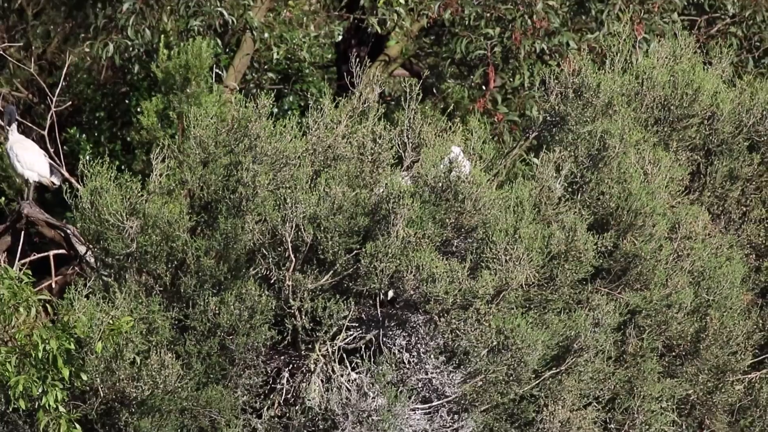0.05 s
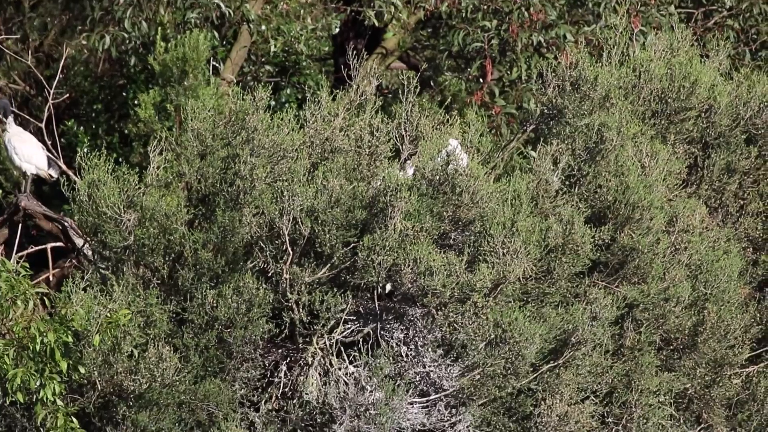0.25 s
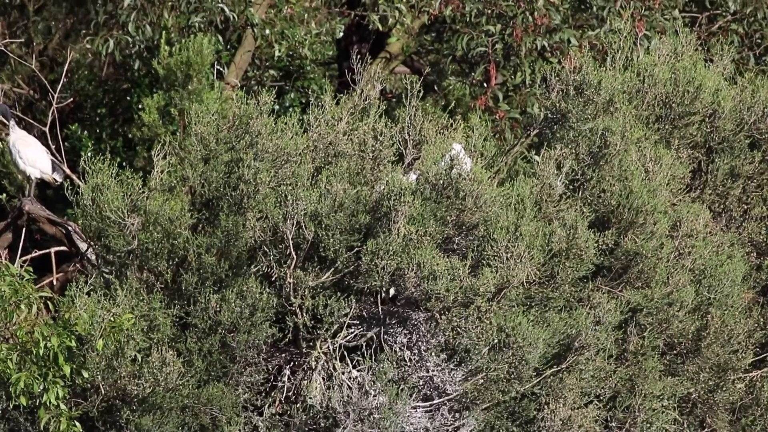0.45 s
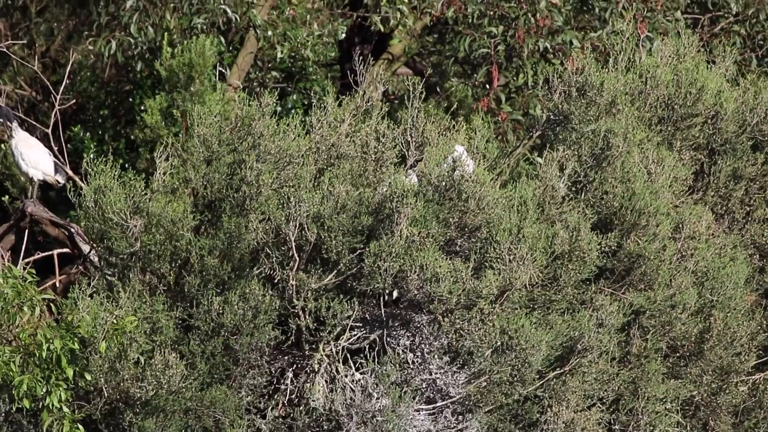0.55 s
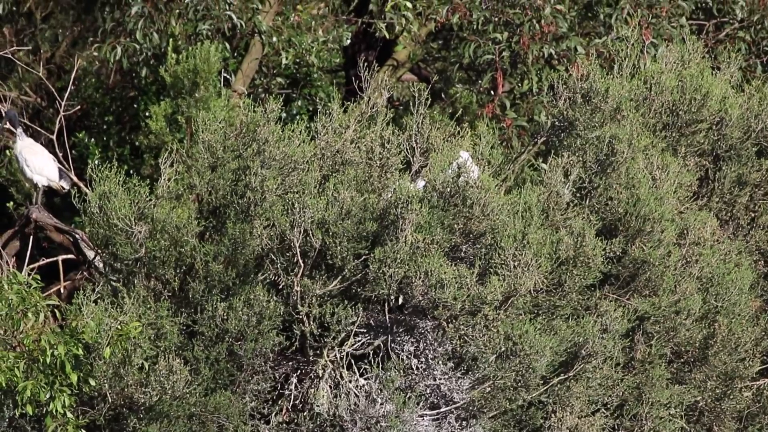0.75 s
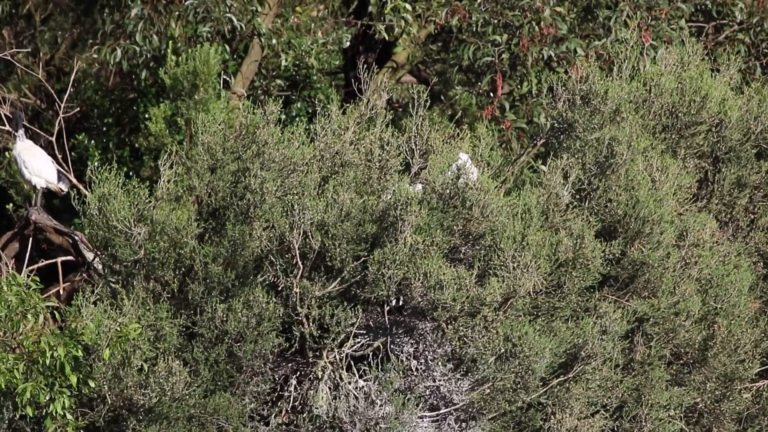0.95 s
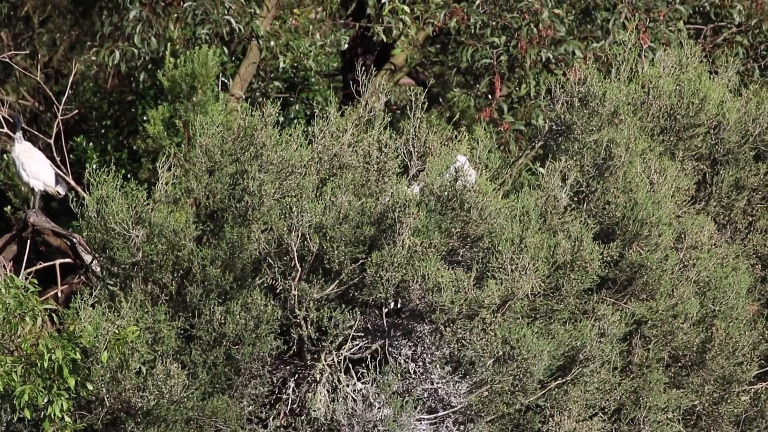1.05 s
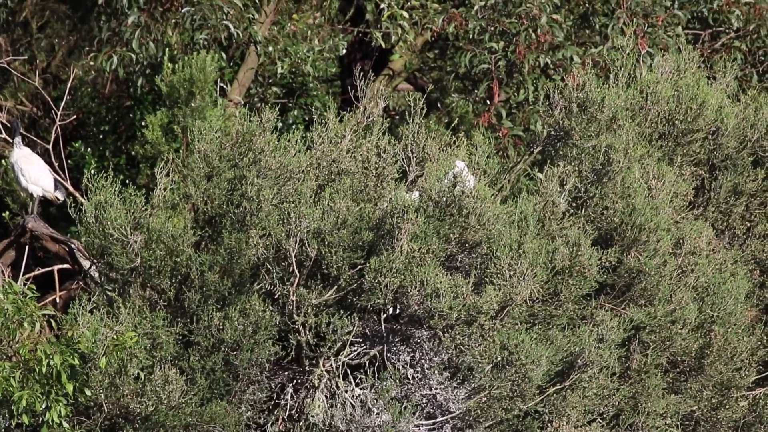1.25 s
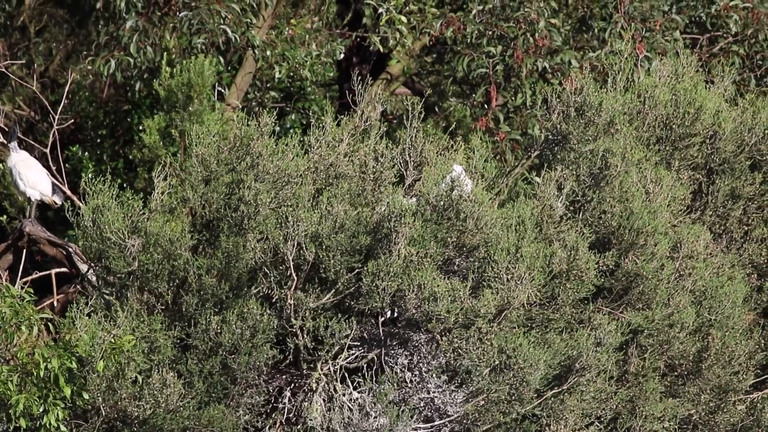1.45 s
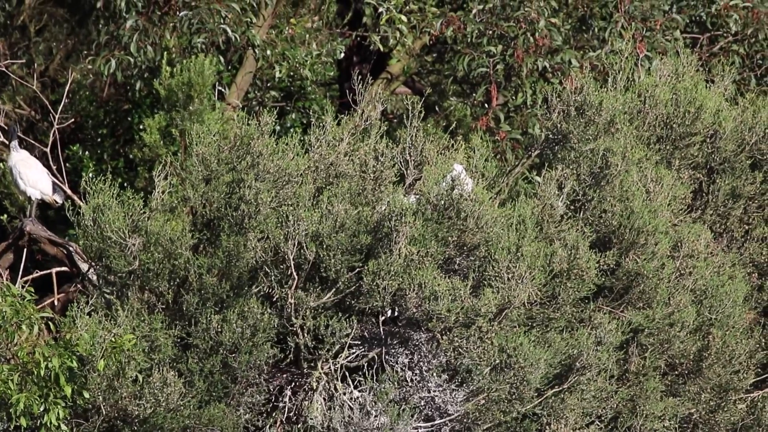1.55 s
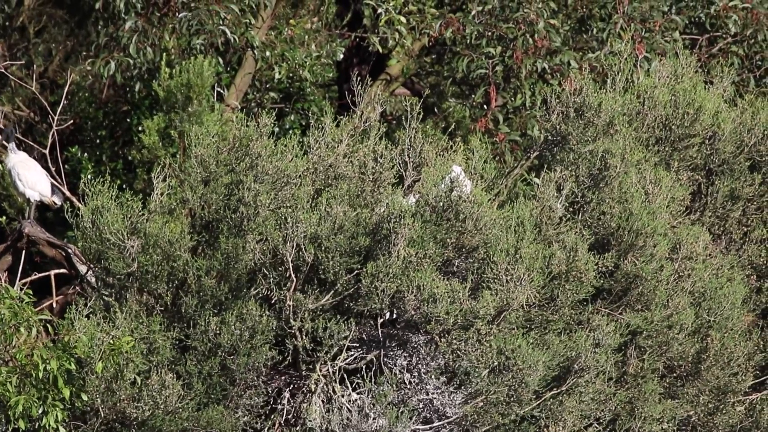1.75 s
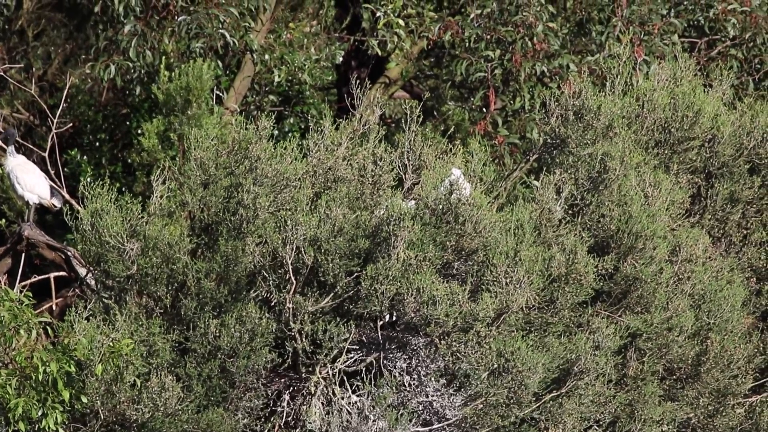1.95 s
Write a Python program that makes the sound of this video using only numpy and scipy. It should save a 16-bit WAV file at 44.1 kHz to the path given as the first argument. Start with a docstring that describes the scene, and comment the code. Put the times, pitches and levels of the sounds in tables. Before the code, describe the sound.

Harsh squawks come from a colony of large birds in the bushes, two close to the microphone, then two farther off. Faint yelps, hoots and honks surround them, and a dry snap sounds near the end over quiet outdoor noise.

```python
"""Bird colony in dense shrubs.

A near bird gives two harsh squawks and a farther one answers, among thin whistles, quick yelps, low
hoots and nasal honks. Each is a source and filter: harmonics of the syrinx shaped by the throat.
A small bird's chip, twig taps and a low outdoor rush are filtered noise; a sharp click rings in
damped modes. The bushes scatter a short echo."""
import sys
import numpy as np
from scipy import signal
from scipy.fft import rfft, irfft, next_fast_len
from scipy.io import wavfile
from scipy.ndimage import uniform_filter1d, map_coordinates

SR = 44100
rng = np.random.default_rng(int(sys.argv[2]) if len(sys.argv) > 2 else 0)


def generate_wav(sig):
    """Save sig (samples, or channels by samples) to the path in sys.argv[1] as 16-bit PCM at SR."""
    pcm = np.round(np.clip(np.atleast_2d(sig).T, -1, 1) * 32767).astype(np.int16)
    wavfile.write(sys.argv[1], SR, pcm)


N = 88200
T = np.arange(N) / SR


def amp(db):
    """Amplitude ratio of a level in decibels."""
    return 10 ** (np.asarray(db) / 20)


def unit_rms(x):
    """Normalisation to unit mean power."""
    return x / np.sqrt(np.mean(x ** 2) + 1e-20)


def response_at(points, hz):
    """Interpolation of (freq_hz, value) points on a logarithmic frequency axis."""
    freqs, values = np.transpose(points)
    return np.interp(np.log(hz + 1), np.log(freqs + 1), values)


def curves(rows, at):
    """Linear interpolation of each later column against the first."""
    knots, *columns = np.transpose(rows)
    return [np.interp(at, knots, column) for column in columns]


def wobble(rate_hz):
    """Smooth random modulation: a spline through Gaussian knots."""
    return map_coordinates(rng.standard_normal(N // 8), [T * rate_hz], mode="wrap")


def filtered(x, response):
    """Linear filtering: the spectrum is multiplied by a (freq_hz, gain_db) response."""
    size = next_fast_len(N + 8192)
    gain = amp(response_at(response, np.fft.rfftfreq(size, 1 / SR)))
    return irfft(rfft(x, size) * gain, size)[:N]


def gate(start, length, attack_s, release_s):
    """Amplitude envelope with quarter-sine edges."""
    ramp = np.minimum((T - start) / attack_s, (start + length - T) / release_s)
    return np.sin(np.pi / 2 * np.clip(ramp, 0, 1))


def notes(rows, throat, attack_s, release_s, jitter, flutter_db=1.5):
    """Source and filter: a harmonic series, weighted by the throat, glides through three pitches."""
    out = np.zeros(N)
    waver = 1 + jitter * wobble(500)
    flutter = amp(flutter_db * wobble(150))
    harmonics = np.arange(1, 12)[:, None]
    for start, length, db, *pitches in rows:
        on = (T >= start) & (T < start + length)
        glide = np.polyfit([0, .5, 1], pitches, 2)
        pitch = np.polyval(glide, (T[on] - start) / length)
        phase = 2 * np.pi * np.cumsum(pitch * waver[on]) / SR
        tone = (amp(response_at(throat, harmonics * pitch)) * np.sin(harmonics * phase)).sum(0)
        envelope = flutter * gate(start, length, attack_s, release_s)
        out[on] += amp(db) * unit_rms(tone) * envelope[on]
    return out


def rasp(pitch, rough, throat, second_ratio, second_depth, shimmer, jitter, lurch, hiss):
    """Amplitude modulation: an unsteady second membrane puts sidebands on the syrinx's harmonics."""
    pitch = pitch * (1 + rough * (jitter * wobble(700) + lurch * wobble(140)))
    phase = 2 * np.pi * np.cumsum(pitch) / SR
    second_phase = 2 * np.pi * np.cumsum(pitch * second_ratio * (1 + 0.0916 * wobble(220))) / SR
    source = hiss * rough * rng.standard_normal(N)
    for k in range(1, 17):
        beating = second_depth * np.sin(second_phase + 1.53 * wobble(130))
        harmonic = np.cos(k * phase + rng.uniform(0, 2 * np.pi))
        source += harmonic * (1 + rough * (beating + shimmer * wobble(450)))
    voice = filtered(source, throat)
    running_power = np.abs(uniform_filter1d(voice ** 2, size=700))
    return voice / np.sqrt(running_power + 1e-12)


# Reverberation time of the bushes: freq_hz, t60_s
SHRUB_DECAY = [(300, 1), (2000, 0.77), (5000, 1), (12000, .25)]


def shrubs(x, wet_db):
    """Multiple scattering: the bushes add a diffuse tail that decays exponentially in each band."""
    hz, t, spectra = signal.stft(rng.standard_normal(SR * 3 // 4), SR, nperseg=256)
    decay = amp(-60 * t / response_at(SHRUB_DECAY, hz)[:, None])
    tail = signal.istft(spectra * decay, SR, nperseg=256)[1]
    return x + amp(wet_db) * signal.fftconvolve(x, tail / np.linalg.norm(tail))[:N]


# Spectrum of the background: freq_hz, gain_db
RUSH_SPECTRUM = [(20, -27), (40, -13.5), (65, -4), (90, -8.5), (120, 0.5), (165, -10.5), (250, -2.5),
                 (310, -9.5), (400, -2), (600, 0), (780, -7), (1000, -4), (1400, -13), (1900, -9.5),
                 (2500, -16.5), (4000, -21), (7000, -29), (15500, -33.5)]


def outdoor_rush():
    """Modulated noise: distant air and foliage rush in patches that drift in time and frequency."""
    level_db, patch_db = -47.5, 3.03
    spectra = signal.stft(rng.standard_normal(N), nperseg=1024)[2]
    patches = uniform_filter1d(rng.standard_normal(spectra.shape), size=4, axis=0)
    patches = uniform_filter1d(patches, size=8, axis=1)
    noise = signal.istft(spectra * amp(patch_db * unit_rms(patches)), nperseg=1024)[1][:N]
    return amp(level_db) * unit_rms(filtered(noise, RUSH_SPECTRUM))


# Whistled notes: start_s, length_s, level_db, first_pitch_hz, middle_pitch_hz, last_pitch_hz
WHISTLES = [(.04, 0.08, -49, 2480, 2520, 2640), (1.645, 0.062, -46.5, 2065, 2005, 1940)]
# Throat response: freq_hz, gain_db
WHISTLE_THROAT = [(2500, 3), (5000, -22), (10000, -60)]


def whistles():
    """Low-pass filtering: the throat leaves a thin, nearly sinusoidal tone that glides slightly."""
    voice = notes(WHISTLES, WHISTLE_THROAT, attack_s=0.042, release_s=0.012, jitter=0.0023, flutter_db=3.5)
    return shrubs(voice, wet_db=-12)


# Yelped notes: start_s, length_s, level_db, first_pitch_hz, middle_pitch_hz, last_pitch_hz
YELPS = [(.084, 0.017, -43, 1030, 1160, 1350), (.106, 0.018, -39, 1086, 1237, 1264),
         (.127, 0.03, -39.5, 1202, 1185, 1154), (.204, 0.031, -43, 1050, 1215, 1270),
         (.226, 0.0044, -28, 1110, 1270, 1250), (.245, 0.026, -35.5, 1104, 1195, 1110),
         (.465, .02, -36, 1160, 1170, 1270), (.604, 0.021, -35.5, 1122, 1211, 1260),
         (.624, 0.029, -51, 1170, 1175, 1180), (.712, .016, -40, 1080, 1187, 1200),
         (.736, 0.02, -36.5, 1146, 1196, 1260), (.76, 0.025, -38.5, 1186, 1197, 1136)]
# Throat response: freq_hz, gain_db
YELP_THROAT = [(1000, -12), (1300, 1), (2000, 18), (2400, 8), (3600, -6), (4800, -10), (6000, -20.5),
               (9000, -37)]


def yelps():
    """Formant resonance: the throat lifts the second harmonic in quick runs of short notes."""
    voice = notes(YELPS, YELP_THROAT, attack_s=0.005, release_s=0.011, jitter=0.0052)
    return shrubs(voice, wet_db=-11)


# Hooted notes: start_s, length_s, level_db, first_pitch_hz, middle_pitch_hz, last_pitch_hz
HOOTS = [(.142, 0.021, -45.5, 554, 560, 535), (.312, 0.03, -40.5, 558, 572, 560),
         (.77, 0.022, -44.5, 633, 593, 564), (.793, 0.02, -38, 584, 578, 550),
         (1.684, 0.023, -43, 584, 562, 524), (1.93, 0.044, -50, 551, 547, 523)]
# Throat response: freq_hz, gain_db
HOOT_THROAT = [(560, 4.5), (1150, -9.5), (2500, -18), (6000, -48)]


def hoots():
    """Spectral roll-off: the fundamental dominates brief, dull notes from deep in the colony."""
    voice = notes(HOOTS, HOOT_THROAT, attack_s=0.018, release_s=0.019, jitter=0.0072)
    return shrubs(voice, wet_db=-10)


# Honks: start_s, length_s, level_db, first_pitch_hz, middle_pitch_hz, last_pitch_hz, beak_hz
HONKS = [(0.151, 0.13, -44.5, 593, 658, 631, 1930), (.85, .045, -48.5, 685, 707, 743, 2100),
         (1.558, 0.069, -47, 569.5, 613, 615, 1810), (1.591, .08, -39, 658.4, 674.6, 657, 1390),
         (1.655, 0.046, -42, 635.5, 611, 610, 1900), (1.695, 0.067, -46, 615.4, 619.4, 590, 1810)]
# Throat response: freq_hz, gain_db
HONK_THROAT = [(400, -26), (620, -2.5), (1250, 4.5), (1900, -2.5), (2500, 0), (3000, -4), (4500, -38),
               (6000, -21), (6750, -11.5), (9000, -44)]


def honks():
    """Cavity resonance: the beak favours one harmonic of each distant, nasal call."""
    peak_db, width_octaves = 10, 0.28
    hz = np.geomspace(300, 12000, 120)
    out = np.zeros(N)
    for *note, beak_hz in HONKS:
        beak_db = peak_db * np.exp(-(np.log2(hz / beak_hz) / width_octaves) ** 2)
        tract = np.transpose([hz, response_at(HONK_THROAT, hz) + beak_db])
        out += notes([note], tract, attack_s=0.015, release_s=0.022, jitter=0.0072)
    return shrubs(out, wet_db=-12.5)


# Vocal effort: time_s, level_db
NEAR_EFFORT = [(.262, -48.5), (.294, -34.5), (.306, -28.5), (.32, -29.5), (.342, -25.5), (.352, -25),
               (.385, -24), (.404, -22.5), (.425, -27), (.44, -38), (.475, -45), (.5, -32.5), (.522, -30),
               (.538, -25), (.556, -26.5), (.574, -32.5), (.594, -26.5), (.61, -35), (.635, -30),
               (.66, -74)]
# Vibration of the syrinx: time_s, pitch_hz, roughness (0 clear, 1 or more all rasp)
NEAR_SYRINX = [(.275, 761, 0.92), (.298, 896.3, 0.65), (.313, 939, 0.38), (.333, 946.4, 0.22),
               (.343, 950.4, 0.6), (.365, 928.3, 0.94), (.385, 919.4, 0.88), (.402, 917.3, 0.38),
               (.435, 927.3, 0.9), (.46, 941.6, 0.6), (.485, 847.6, 1.16), (.512, 890, 1.06),
               (.534, 917.6, 0.38), (.558, 903, 0.57), (.572, 896.3, 0.94), (.596, 865.6, 0.48),
               (.64, 861, 1)]
# Throat response in the clear tone: freq_hz, gain_db
NEAR_CLEAR_THROAT = [(900, -17), (1800, 1.5), (2750, -13), (3700, -17.5), (4650, -21.5), (5550, -30),
                     (6500, -33), (7450, -30), (8350, -24.5), (9200, -30), (10500, -42), (15000, -50)]
# Throat response in the rasp: freq_hz, gain_db
NEAR_RASP_THROAT = [(300, -80), (560, -16), (720, -8), (930, -24), (1170, -24.5), (1450, -5), (1650, 1),
                    (1810, 0.5), (2030, -3.5), (2250, -7.5), (2800, -10), (3650, -13.5), (4050, -25.5),
                    (4600, -26), (5100, -39), (5600, -24), (6100, -42), (8500, -35.5), (10500, -47),
                    (15000, -60)]
# The throat opens on the third harmonic early in the first squawk: time_s, gain_db
THIRD_HARMONIC = [(.3, -19), (.315, 13), (.329, 14), (.34, 6), (.36, -1)]


def near_bird():
    """Periodic and irregular vibration: two loud squawks break from a piercing tone into a rasp."""
    level_db, = curves(NEAR_EFFORT, T)
    pitch, rough = curves(NEAR_SYRINX, T)
    third_db, = curves(THIRD_HARMONIC, T)
    rough = np.clip(rough, 0, 1)
    waver, flutter_db = 0.009, 4.5
    phase = 2 * np.pi * np.cumsum(pitch * (1 + waver * rough * wobble(600))) / SR
    harmonics = np.arange(1, 17)[:, None]
    throat_db = response_at(NEAR_CLEAR_THROAT, harmonics * pitch) + third_db * (harmonics == 3)
    gains = amp([db + flutter_db * rough * wobble(220) for db in throat_db])
    partials = gains * np.sin(harmonics * phase + rng.uniform(0, 2 * np.pi, harmonics.shape))
    clear = np.sqrt(2) * partials.sum(0) / np.linalg.norm(gains, axis=0)
    harsh = rasp(pitch, np.ones(N), NEAR_RASP_THROAT, second_ratio=0.42, second_depth=2.4,
                 shimmer=1.0, jitter=0.019, lurch=0.0396, hiss=0.29)
    voice = np.sqrt(1 - rough ** 2) * clear + rough * harsh  # equal-power mix
    sounding = (T > NEAR_EFFORT[0][0]) & (T < NEAR_EFFORT[-1][0])
    return shrubs(voice * amp(level_db + wobble(121.2)) * sounding, wet_db=-9.5)


# A small bird's call: start_s, length_s, level_db
CHIPS = [(0.728, 0.029, -46)]
# Its spectrum: freq_hz, gain_db
CHIP_BANDS = [(5000, -20), (6200, -8), (6750, -2), (7450, -13), (8200, -5.5), (8900, -18), (11000, -39)]


def chip():
    """Band-limited noise: two high, narrow bands make a scratchy chip."""
    scratch = unit_rms(filtered(rng.standard_normal(N), CHIP_BANDS))
    envelope = sum(amp(db) * gate(start, length, attack_s=0.005, release_s=0.0045)
                   for start, length, db in CHIPS)
    return shrubs(scratch * envelope, wet_db=-9.5)


# Answering squawks, the last one faint: start_s, length_s, level_db, pitch_hz
FAR_SQUAWKS = [(1.019, .155, -39.5, 999.2), (1.229, .15, -39.5, 1006), (1.468, 0.1086, -54.5, 1027)]
# Irregularity of the syrinx: fraction_of_call, roughness (0 to 1)
FAR_ROUGHNESS = [(0, .85), (.28, 0.4), (.45, .9), (.7, .75), (.82, .45), (1, .85)]
# Throat response: freq_hz, gain_db
FAR_THROAT = [(300, -66), (650, 2.5), (980, -1.5), (1150, -33), (1350, 4), (1650, 5), (1950, 3.5),
              (2250, 6), (2900, 1.5), (3900, -1), (4500, -10.5), (6800, -16.5), (9000, -36), (15000, -57)]


def far_bird():
    """Frequency modulation: each rasping squawk scoops up towards its pitch, then sags."""
    scoop, sag = 0.25, 0.03057  # fractions of the pitch
    scoop_s, flutter_db = 0.022, 1.56
    pitch = np.full(N, float(FAR_SQUAWKS[0][-1]))
    rough, envelope = np.zeros(N), np.zeros(N)
    for start, length, db, hz in FAR_SQUAWKS:
        on = T >= start
        age = np.minimum(T[on] - start, length)
        pitch[on] = hz * (1 - scoop * np.exp(-age / scoop_s) - sag * (age / length) ** 2)
        rough[on] = curves(FAR_ROUGHNESS, age / length)[0]
        envelope += amp(db) * gate(start, length, attack_s=0.036, release_s=0.02)
    voice = rasp(pitch, rough, FAR_THROAT, second_ratio=0.35, second_depth=1.5,
                 shimmer=0.44, jitter=0.015, lurch=0.047, hiss=0.8)
    return shrubs(voice * envelope * amp(flutter_db * wobble(130)), wet_db=-5)


# Faint knocks among the twigs: start_s, level_db
TAPS = [(1.021, -42), (1.804, -46.5)]
# Their spectrum: freq_hz, gain_db
TAP_SPECTRUM = [(300, -30), (1100, 3), (2200, -7), (4000, -10), (12000, -31)]


def twig_taps():
    """Damped impacts: each knock is a burst of dull noise that decays exponentially."""
    t60_s = 0.047
    envelope = sum(amp(db - 60 * np.abs(T - start) / t60_s) * (T >= start) for start, db in TAPS)
    noise = unit_rms(filtered(rng.standard_normal(N), TAP_SPECTRUM))
    return shrubs(envelope * noise, wet_db=-30)


# A snap close by: start_s, level_db
CLICKS = [(1.7289, -17.5)]
# Its modes: freq_hz, gain_db, t60_s
CLICK_MODES = [(2050, -13.5, 0.024), (5130, -23, 0.018), (7230, -5, 0.0073), (8370, 1.5, 0.0021),
               (10050, -15, 0.0087), (10700, -22, 0.012), (14940, -30, .004)]


def click():
    """Modal ringing: an impulse excites damped sinusoids, heard as a dry, bright snap."""
    out = np.zeros(N)
    for start, db in CLICKS:
        age = np.maximum(T - start, 0)
        for hz, gain_db, t60_s in CLICK_MODES:
            out += amp(db + gain_db - 60 * age / t60_s) * np.sin(2 * np.pi * hz * age)
    return shrubs(out, wet_db=-23.5)


def scene():
    """Superposition: all the sources add in one channel."""
    birds = near_bird() + far_bird() + yelps() + honks() + hoots() + whistles() + chip()
    return (birds + click() + twig_taps() + outdoor_rush())[None]


def record(dry):
    """Band limiting: an ideal low-pass filter follows a short fade-in."""
    fade_span_s, cutoff_hz = (0.037, 0.074), 15850
    faded = dry * np.interp(T, fade_span_s, [0, 1])
    size = next_fast_len(N + 8192)
    passband = np.fft.rfftfreq(size, 1 / SR) < cutoff_hz
    return irfft(rfft(faded, size) * passband, size)[..., :N]


dry = scene()
out = record(dry)
generate_wav(out)
```